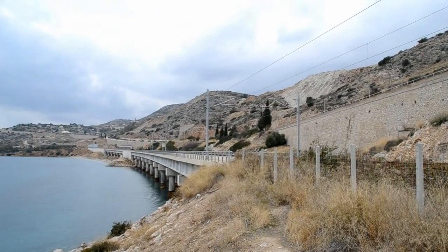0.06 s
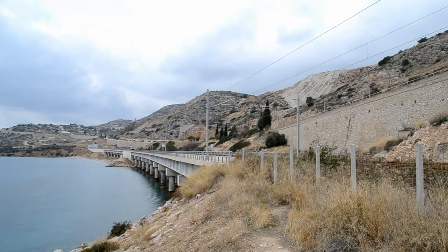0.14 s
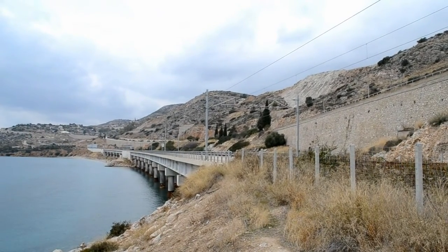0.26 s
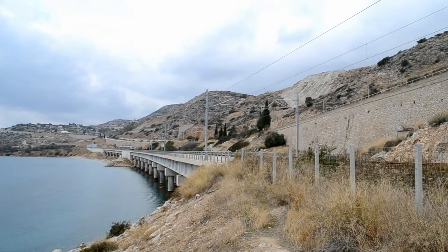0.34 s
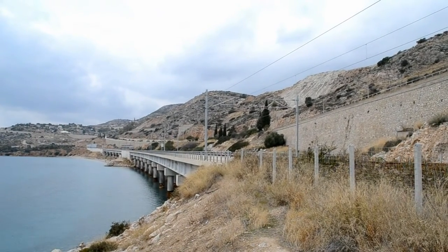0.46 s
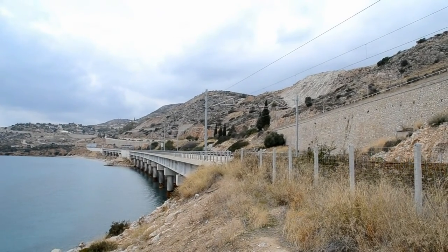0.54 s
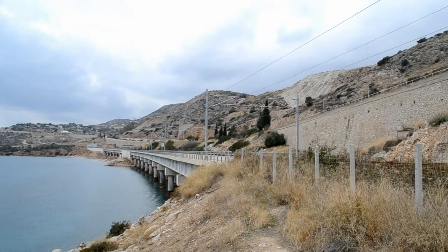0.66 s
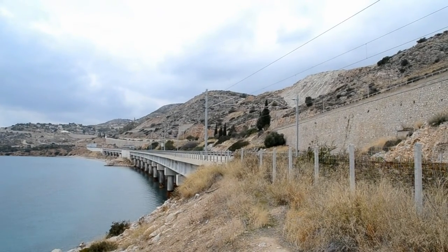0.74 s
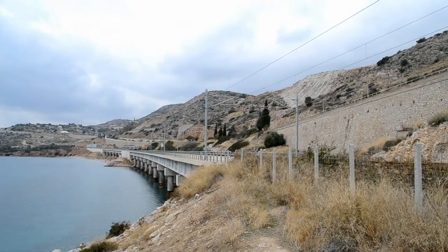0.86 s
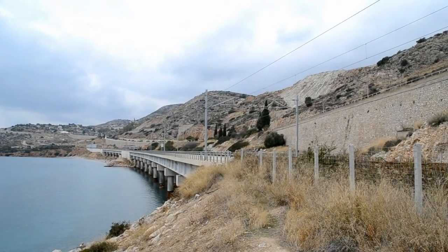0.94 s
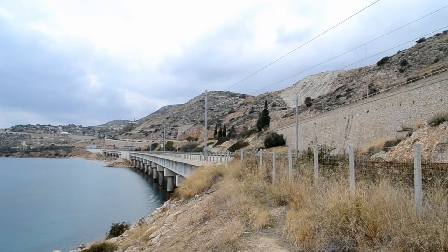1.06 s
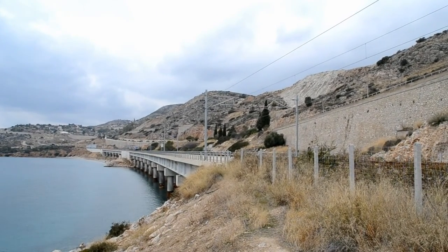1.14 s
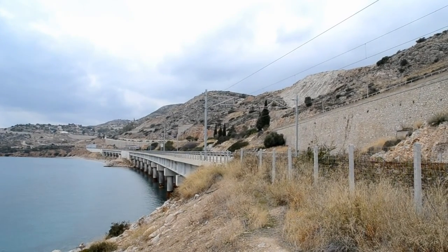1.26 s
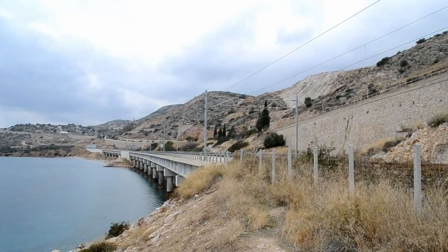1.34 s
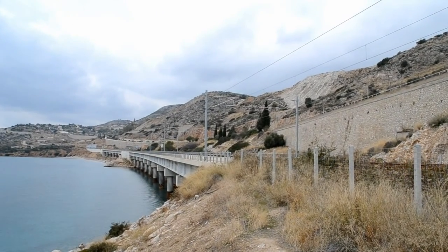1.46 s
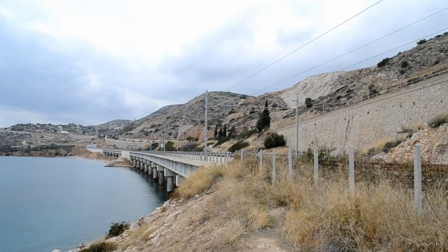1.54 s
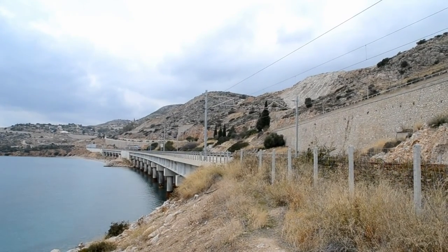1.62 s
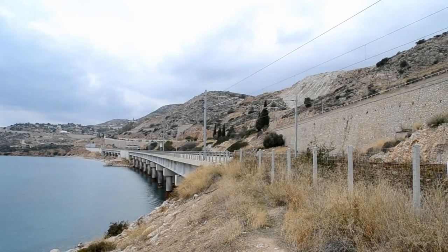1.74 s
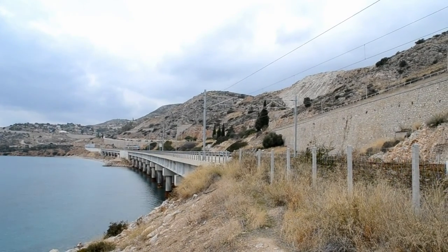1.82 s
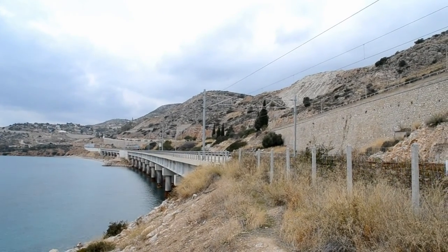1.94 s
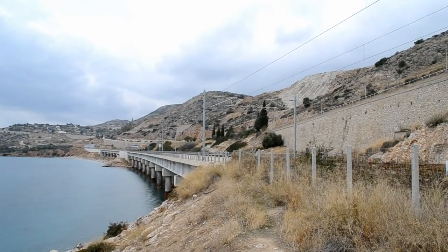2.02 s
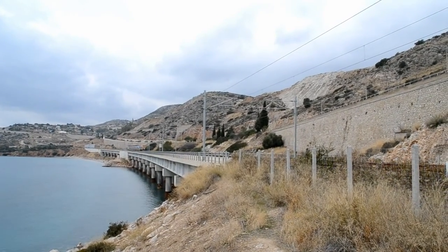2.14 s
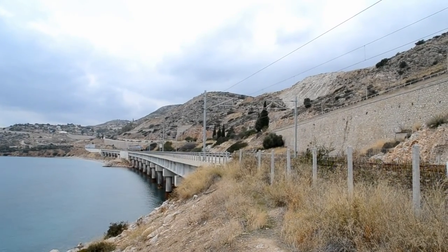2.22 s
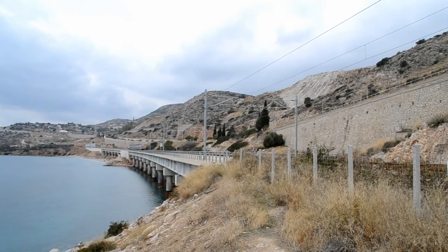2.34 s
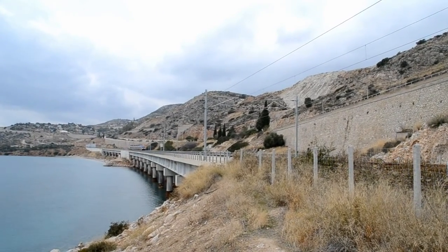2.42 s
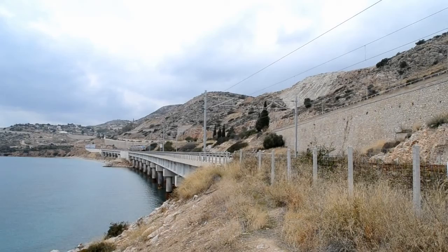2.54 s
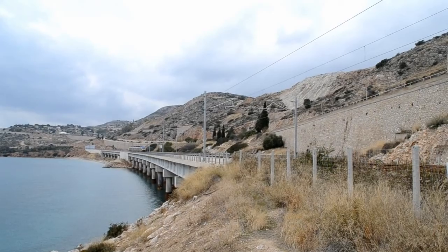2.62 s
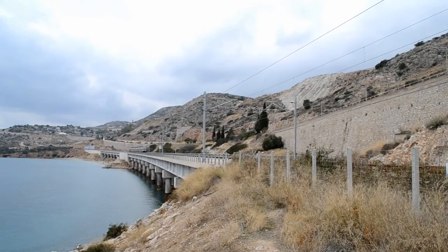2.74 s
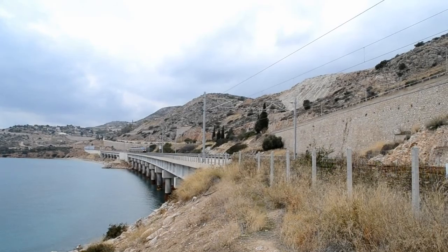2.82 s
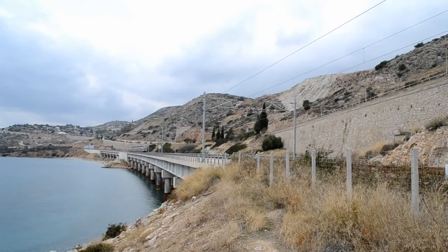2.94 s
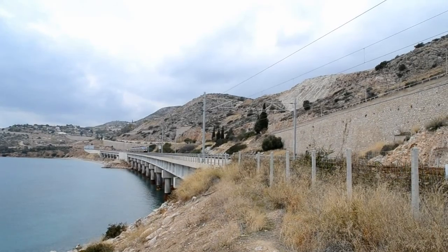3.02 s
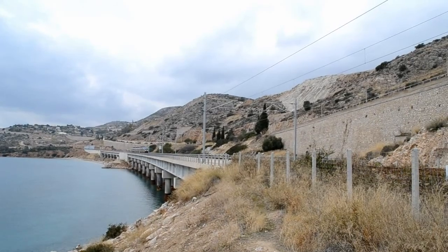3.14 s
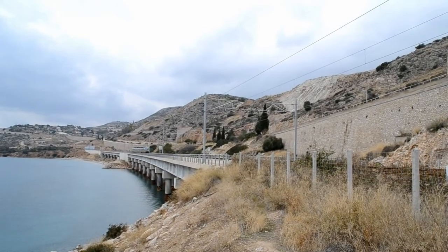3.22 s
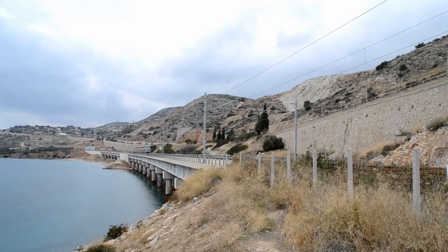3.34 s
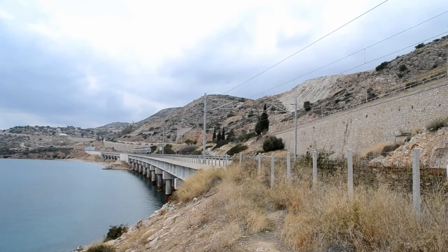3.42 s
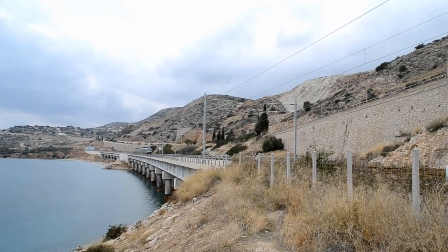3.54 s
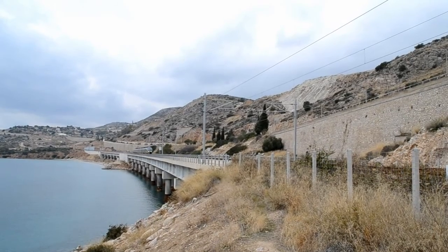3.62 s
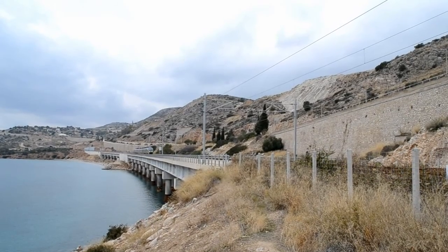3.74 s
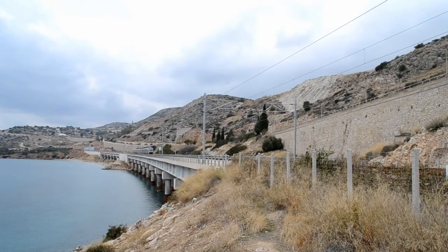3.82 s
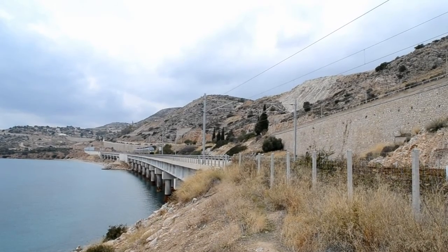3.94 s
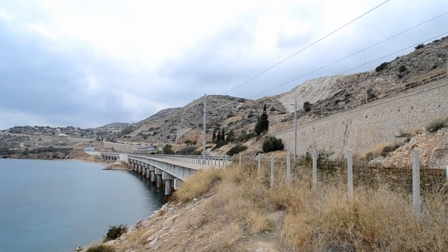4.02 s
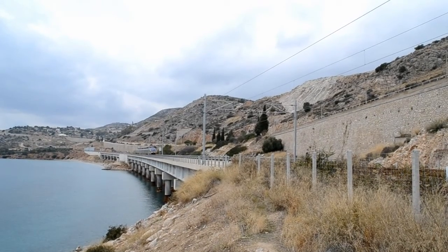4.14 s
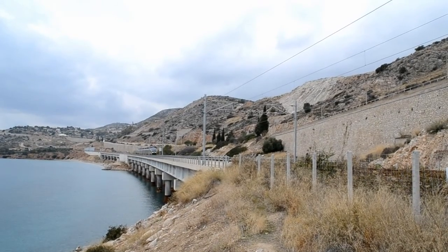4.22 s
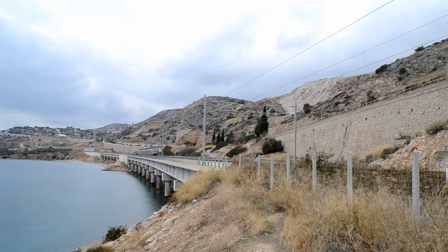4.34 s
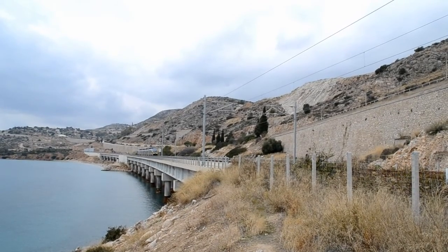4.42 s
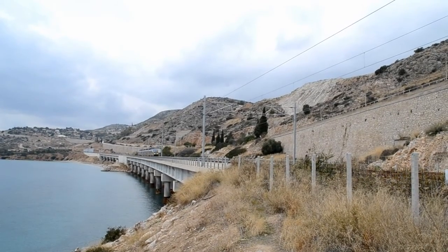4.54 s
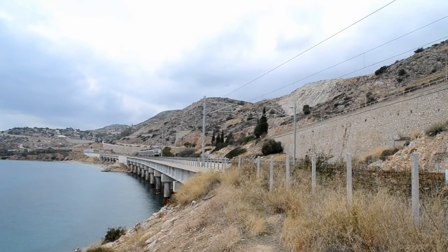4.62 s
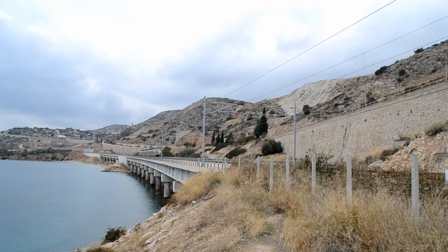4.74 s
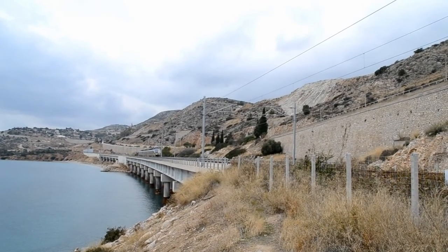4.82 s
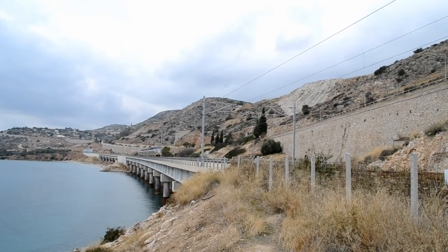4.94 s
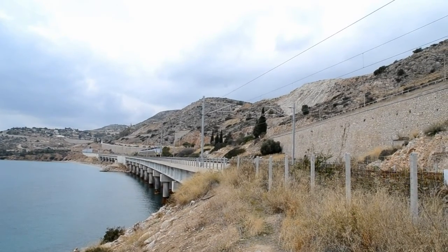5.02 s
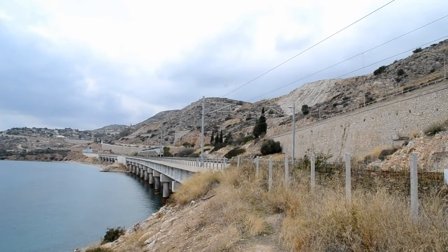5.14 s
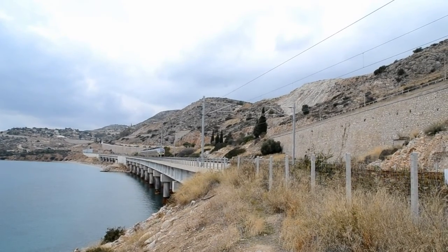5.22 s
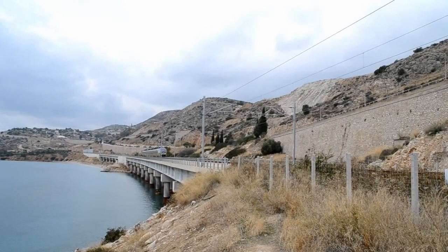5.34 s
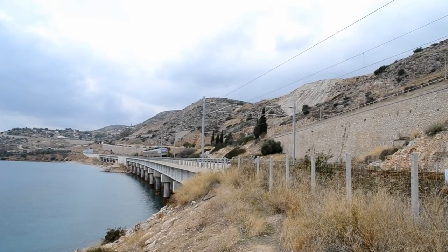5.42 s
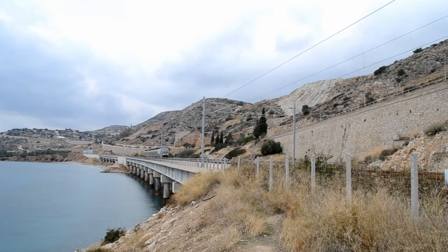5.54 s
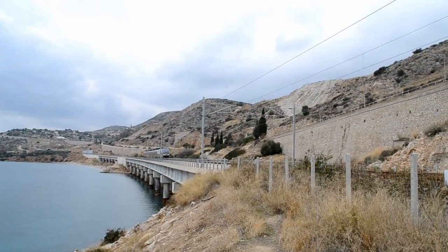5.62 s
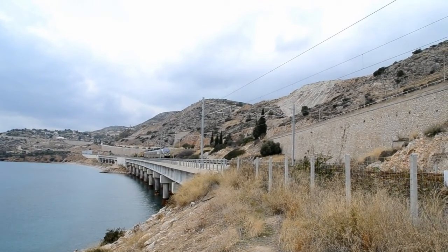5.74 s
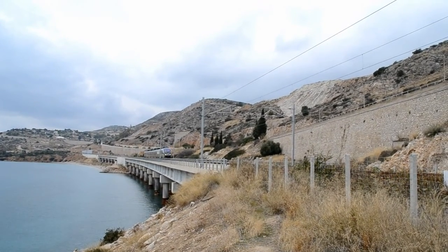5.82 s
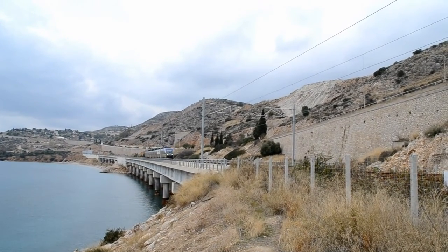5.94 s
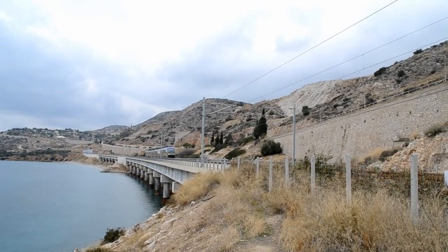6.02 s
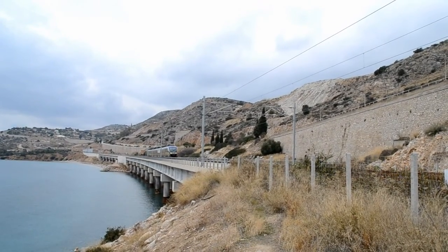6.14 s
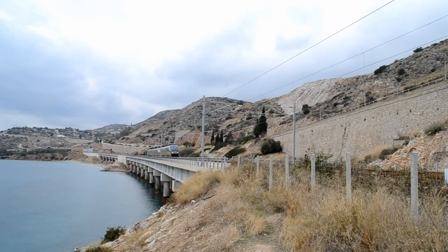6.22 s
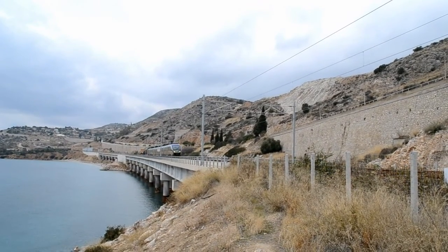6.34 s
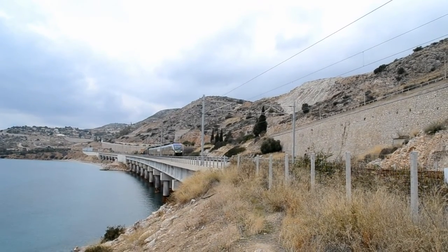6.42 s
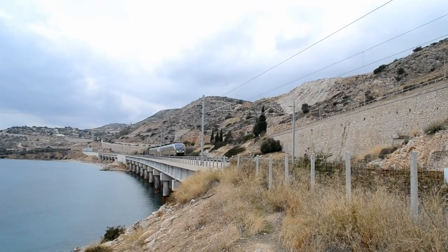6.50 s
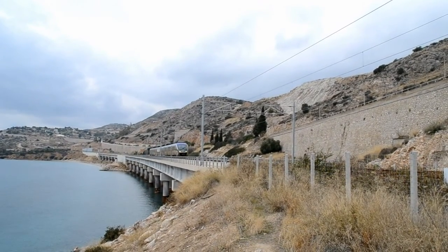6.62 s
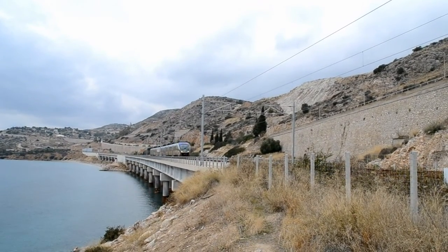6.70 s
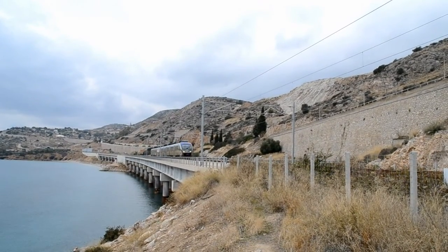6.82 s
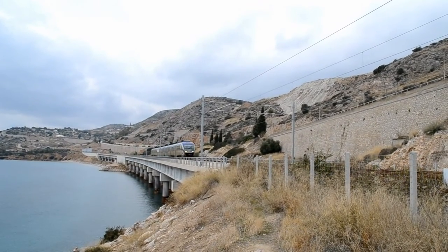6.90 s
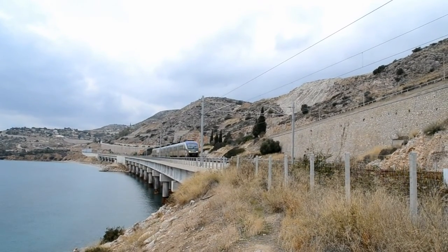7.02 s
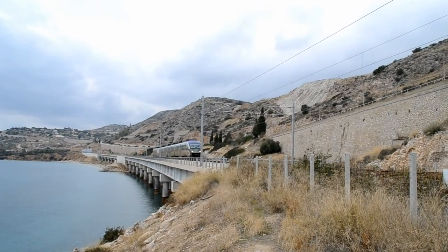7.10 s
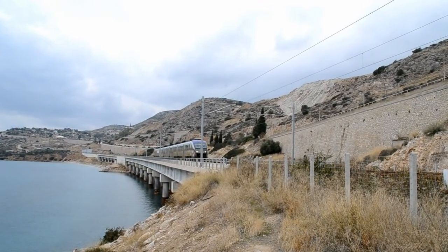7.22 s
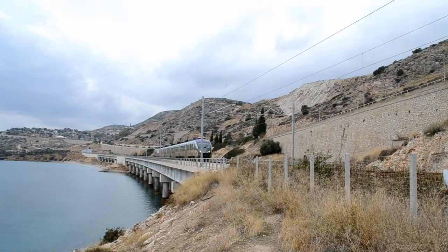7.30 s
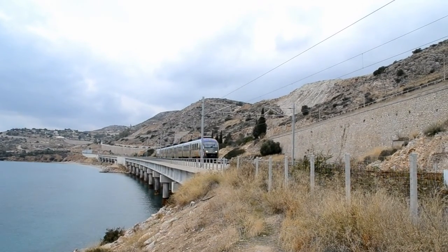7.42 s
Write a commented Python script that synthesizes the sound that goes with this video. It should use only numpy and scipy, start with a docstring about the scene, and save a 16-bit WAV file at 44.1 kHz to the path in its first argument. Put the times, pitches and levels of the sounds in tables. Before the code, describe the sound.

Quiet water wash and windy dry grass, one sharp plastic double click close by, then a train's roar and singing rails steadily growing nearer.

```python
"""An electric train comes along a viaduct above the sea, with water, wind and a hand-held camera close by.
First water washes and gusts rush as filtered noise, dry grass crackles in grains, ticks and scrapes;
the camera bumps softly as damped sines, and its shell gives one sharp double click as decaying modes.
Then a small bird peeps once, a gliding sine. Bass and rolling roar swell as noise, rails sing ahead of
the train as wavering resonances, hiss brightens the roar, and clacks and a deck drone come last."""
import sys
import numpy as np
from scipy import signal
from scipy.fft import rfft, irfft, next_fast_len
from scipy.io import wavfile
from scipy.ndimage import uniform_filter1d, map_coordinates

SR = 44100
rng = np.random.default_rng(int(sys.argv[2]) if len(sys.argv) > 2 else 0)


def generate_wav(sig):
    """Save sig (samples, or channels by samples) to the path in sys.argv[1] as 16-bit PCM at SR."""
    pcm = np.round(np.clip(np.atleast_2d(sig).T, -1, 1) * 32767).astype(np.int16)
    wavfile.write(sys.argv[1], SR, pcm)


N = 329427
TIME_S = np.arange(N) / SR


def amp(db):
    """Logarithmic level: decibels become an amplitude gain."""
    return 10 ** (np.asarray(db) / 20)


def unit(x):
    """Normalisation: scale to rms 1."""
    return x / np.sqrt(np.mean(x ** 2) + 1e-20)


def wobble(rate):
    """Random modulation: a smooth curve through random knots, rate of them a second."""
    knots = rng.standard_normal(int(N * rate / SR) + 4)
    return map_coordinates(knots, [np.arange(N) * rate / SR])


def swell(at, half_length):
    """Gaussian envelope: 1 at its top, 1/e at half_length seconds to either side."""
    return np.exp(-((TIME_S - at) / half_length) ** 2)


def filtered(x, response):
    """Linear filtering: the spectrum is multiplied by a response of frequency."""
    m = next_fast_len(N + SR // 2)
    return irfft(rfft(x, m) * response(np.fft.rfftfreq(m, 1 / SR)), m)[:N]


def coloured(x, spectrum):
    """Spectral shaping: x through a (Hz, dB) curve, straight over log frequency, at rms 1."""
    f, db = np.transpose(spectrum)
    return unit(filtered(x, lambda hz: amp(np.interp(np.log(hz + 1), np.log(f), db))))


def rush(spectrum, patchy_db):
    """Turbulent noise: random gain in patches of time and frequency, then spectral shaping to rms 1."""
    z = signal.stft(rng.standard_normal(N), nperseg=512)[2]
    across_pitch = uniform_filter1d(rng.standard_normal(z.shape), size=7, axis=0)
    patches = uniform_filter1d(across_pitch, size=12, axis=1)
    noise = signal.istft(z * amp(patchy_db * unit(patches)), nperseg=512)[1][:N]
    return coloured(noise, spectrum)


def singing(modes):
    """Resonance: narrow (Hz, half width Hz, dB) modes under steady random shaking, at rms 1."""
    def response(f):
        return sum(amp(db) / (1 + ((f - hz) / width) ** 2) for hz, width, db in modes)
    return unit(filtered(rng.standard_normal(N), response))


def add(track, s, db, sound):
    """Superposition: mix a sound in at time s with the given peak level."""
    room = track[round(s * SR):][:len(sound)]
    room += (amp(db) * sound / np.abs(sound).max())[:len(room)]


def snap(hz, t60, order=2):
    """Impact noise: an exponentially dying burst in an octave band around one pitch, at peak 1."""
    t = np.arange(SR // 5) / SR
    edges = np.clip([hz / np.sqrt(2), hz * np.sqrt(2)], 50, SR / 2 - 100)
    band = signal.butter(order, edges, "band", fs=SR, output="sos")
    burst = signal.sosfilt(band, rng.standard_normal(len(t)) * amp(-60 * t / t60))
    return burst / np.abs(burst).max()


# spectrum of the washing water: pitch_hz [Hz], level_db [dB per Hz, relative]
SEA_SPECTRUM = [(20, -22.5), (50, -7.5), (90, -1.5), (150, -2), (220, -2), (310, -6.5), (460, 4), (680, -1),
                (1100, -0.5), (1700, -5), (3300, -12.5), (4400, -25.5), (9500, -39.5), (11500, -50.5)]


def sea():
    """Broadband turbulence: water washes evenly on the rocks far below."""
    return amp(-53.5 + 0.47 * wobble(2.47)) * rush(SEA_SPECTRUM, patchy_db=0.2)


# strength of the wind in the grass: start_s [s], level_db [dB]
WIND_STRENGTH = [(0.0, -76), (0.29, -73.5), (0.35, -69), (0.58, -69), (1.01, -66), (1.23, -66),
                 (1.4, -70.5), (1.55, -70.5), (1.63, -76.5), (1.8, -73.5), (2.0, -71), (2.26, -70.5),
                 (2.68, -77.5), (2.98, -76.5), (3.17, -75.5), (3.3, -77), (3.46, -70), (3.719, -69.5),
                 (4.0, -67.5), (4.69, -75), (5.201, -77.5)]
# the strongest wind; from CALM_S on it dies down at a steady rate
STRONGEST_DB, CALM_S, CALM_DB_PER_S = -66, 5.3, 2.5


def wind_level():
    """Common driving force: wind strength in dB relative to its strongest, shared by air and grass."""
    when, strength_db = np.transpose(WIND_STRENGTH)
    calming_db = CALM_DB_PER_S * np.maximum(TIME_S - CALM_S, 0)
    return np.interp(TIME_S, when, strength_db - STRONGEST_DB) - calming_db


# spectrum of the rushing gusts: pitch_hz [Hz], level_db [dB per Hz, relative]
GUST_SPECTRUM = [(350, -40.5), (800, 1.5), (1400, -7.5), (1900, -1.5), (2400, 2.5), (2750, -1.5), (3350, 0),
                 (3750, -4.5), (4200, -17), (6000, -20), (9000, -44)]
# level at the strongest wind, and dB gained per dB of wind
GUST_DB, GUST_GROWS = -53.5, 0.86


def gusts(wind_db):
    """Aerodynamic noise: moving air rushes over the slope, louder with the wind."""
    gust_db = GUST_DB + GUST_GROWS * wind_db + 0.45 * wobble(9)
    return amp(gust_db) * rush(GUST_SPECTRUM, patchy_db=2.0)


# spectrum of the dry grass: pitch_hz [Hz], level_db [dB per Hz, relative]
GRASS_SPECTRUM = [(2000, -18), (3600, 7), (4600, 0.5), (5800, 2), (6500, -10.5), (7200, -11.5),
                  (8500, -0.5), (9800, -1), (10400, -11.5), (11300, -16.5)]
# tufts brush together in short flurries: centre_s [s], level_db [dB], half_length_s [s]
GRASS_FLURRIES = [(.37, -73, 0.071), (0.555, -79, 0.056), (1.565, -66.5, 0.028), (2.42, -72, 0.045),
                  (3.03, -70.5, 0.026), (3.14, -67.5, 0.089)]
# level at the strongest wind, and dB gained per dB of wind
GRASS_DB, GRASS_GROWS = -65, 1.4
# single stalks: ring time (s), spread of sizes (dB), level over the finest touches (dB)
STALK_LIFE_S, STALK_SPREAD_DB, STALK_DB = 0.015, 12, -4


def grass(wind_db):
    """Granular friction: dry stalks brush together in a dense sum of tiny random contacts."""
    touches = (rng.random(N) < 3500 / SR) * rng.standard_normal(N)
    crackle = np.zeros(N)
    # each stalk cracks at its own size and pitch, up to the last wind entry
    for moment, size, pitch in rng.random((900, 3)):
        crack = snap(hz=3500 + 6000 * pitch, t60=STALK_LIFE_S)
        add(crackle, moment * WIND_STRENGTH[-1][0], STALK_SPREAD_DB * size, crack)
    grains = coloured(unit(touches) + amp(STALK_DB) * unit(crackle), GRASS_SPECTRUM)
    stir = amp(GRASS_DB + GRASS_GROWS * wind_db)
    flurries = sum(amp(db) * swell(s, length) for s, db, length in GRASS_FLURRIES)
    # independent stirrings add in power
    return np.hypot(stir, flurries) * amp(1.0 * wobble(45)) * grains


# puffs on the microphone: centre_s [s], half_length_s [s], level_db [dB]
WIND_BUFFETS = [(0.048, 0.071, -68), (0.517, 0.13, -62), (1.723, 0.1, -67), (2.416, 0.061, -63),
                (2.84, 0.1, -61), (3.09, 0.073, -59)]
# their spectrum: pitch_hz [Hz], level_db [dB per Hz, relative]
BUFFET_SPECTRUM = [(20, -12), (45, -2), (85, 3), (150, -10), (300, -32), (700, -60)]


def buffeting():
    """Pressure fluctuation: puffs of wind press softly on the microphone as low noise."""
    puffs = sum(amp(db) * swell(s, length) for s, length, db in WIND_BUFFETS)
    return puffs * coloured(rng.standard_normal(N), BUFFET_SPECTRUM)


# dry stalks tick: start_s [s], peak_db [dB], pitch_hz [Hz], ring_time_s [s]
STALK_TICKS = [(0.14, -53, 5000, .017), (0.1562, -42, 2300, 0.017), (0.193, -51, 4500, .017),
               (0.332, -41.5, 2950, .02), (0.3796, -57, 7500, .016), (0.567, -49, 4400, .017),
               (0.601, -44, 3100, .012), (1.005, -54, 5600, .012), (1.07, -51, 8000, .012),
               (1.2342, -52, 5600, .014), (1.4692, -55, 4730, .014), (1.537, -56, 5400, .01),
               (1.552, -55, 5400, .017), (2.592, -53.5, 4960, .014), (2.999, -49, 4140, .017),
               (3.087, -57, 5200, .017), (3.1185, -43, 2700, .008), (3.125, -47, 3900, .02),
               (3.148, -55, 5400, .017), (3.179, -39, 2300, 0.018), (3.24, -57, 6200, .017),
               (3.5632, -33, 2460, .015), (3.623, -51, 4300, .014), (3.7, -45.5, 4120, .017),
               (3.723, -54, 5800, .017), (3.784, -52, 5600, .014), (3.977, -53, 5060, .01),
               (4.021, -54, 5500, .014), (4.121, -37, 2200, .012), (4.133, -36.5, 2080, .014),
               (4.731, -48, 3470, .024)]


def stalk_ticks():
    """Impulsive contact: single dry stalks knock, each a short band of noise."""
    out = np.zeros(N)
    for s, db, hz, life in STALK_TICKS:
        add(out, s, db, snap(hz, t60=life, order=5))
    return out


# stalks scrape past each other: start_s [s], length_s [s], peak_db [dB], pitch_hz [Hz]
STALK_SCRAPES = [(0.335, 0.037, -49, 3000), (3.105, .09, -47, 2900), (3.568, 0.077, -44, 3100)]
# ring time of one slip, and how much the slips weaken along a scrape
SLIP_LIFE_S, SLIP_FADE_DB = 0.0087, 9


def scrapes(count=6):
    """Stick-slip friction: stalks catch and slip in uneven little cracks that weaken as they part."""
    out = np.zeros(N)
    for s, length, db, hz in STALK_SCRAPES:
        for part in rng.random(count):
            slip = snap(hz, t60=SLIP_LIFE_S, order=4)
            add(out, s + part * length, db - SLIP_FADE_DB * part, slip)
    return out


# soft handling bumps: start_s [s], peak_db [dB], pitch_hz [Hz], rub_db [dB, relative to the thud]
HAND_BUMPS = [(0.445, -48, 170, -10), (0.487, -41, 173, -5), (0.511, -46, 100, -5), (0.774, -45, 170, -13),
              (0.83, -47, 190, -3), (1.765, -54, 70, -8), (1.838, -43.5, 205, -2), (2.906, -40, 179, -18),
              (2.965, -48, 102, -13), (3.029, -48, 90, -16), (3.076, -40, 176, -2)]
# a bump dies away by 60 dB within this many of its own cycles
BUMP_CYCLES = 5.7


def hand_bumps():
    """Damped oscillation: the hand bumps the camera in low thuds, with a little rubbing noise."""
    out, t = np.zeros(N), np.arange(SR // 5) / SR
    soft_onset = 1 - np.exp(-(t / 0.0011) ** 2)
    for s, db, pitch_hz, rub_db in HAND_BUMPS:
        life = BUMP_CYCLES / pitch_hz
        thud = np.sin(2 * np.pi * pitch_hz * t) * amp(-60 * t / life) * soft_onset
        add(out, s, db, thud + amp(rub_db) * snap(hz=383, t60=life))
    return out


# modes of the plastic shell: pitch_hz [Hz], width_hz [Hz], level_db [dB, relative spectral peak]
SHELL_MODES = [(830, 100, -7), (1310, 56, -14), (1490, 180, 1), (2100, 68, -4.5), (2450, 140, 5),
               (3260, 200, 4.5), (3440, 100, -7), (3840, 450, -27), (4940, 440, -12.5), (6930, 430, -19),
               (9400, 1200, -35)]
# a catch snaps and rebounds: start_s [s], peak_db [dB], brightness [dB per octave]
CATCH_CONTACTS = [(0.93665, -9.5, -2), (0.94062, -14.5, 3), (0.9472, -33, 0)]
# the dry crack of each contact, relative to its ring
CRACK_DB = -28


def catch_click():
    """Modal ringing: a snapping catch sets the camera's plastic shell ringing at each contact."""
    out, t = np.zeros(N), np.arange(SR // 5) / SR
    hz, width, mode_db = np.transpose(SHELL_MODES)[:, :, None]
    # a mode of width w dies as exp(-pi w t)
    modes = amp(mode_db) * width * np.exp(-np.pi * width * t) * np.sin(2 * np.pi * hz * t)
    onset = 1 - np.exp(-(t / 0.00028) ** 2)
    # so small a shell radiates no bass
    no_bass = signal.butter(4, 650, "high", fs=SR, output="sos")
    for s, db, bright_db in CATCH_CONTACTS:
        ring = (amp(bright_db * np.log2(hz)) * modes).sum(axis=0) * onset
        add(out, s, db, signal.sosfilt(no_bass, ring))
        add(out, s, db + CRACK_DB, snap(hz=7000, t60=0.012))
    return out


def bird(at=2.535, length=.033, lead_in=.055, hz=7110, fall=3200, db=-78):
    """Frequency glide: one thin peep, a soft level start, then a louder end falling by fall Hz per s."""
    t = TIME_S - at
    pitch_hz = hz - fall * np.maximum(t, -length / 2)
    envelope = swell(at, length) + swell(at - lead_in, length) / 3
    return amp(db) * envelope * np.sin(2 * np.pi * np.cumsum(pitch_hz) / SR)


# the train approaches at a steady speed: distance at the start (m), speed (m/s)
START_M, SPEED_M_S = 230, 25


def beyond(metres):
    """Uniform motion: how far, in metres, the train still is outside a given distance."""
    return np.maximum(START_M - SPEED_M_S * TIME_S - metres, 0)


# the train is heard clear of the hillside from this distance (m); loss beyond it (dB per m)
EMERGES_M, HIDDEN_DB_PER_M = 155, 0.6


def hillside_loss():
    """Acoustic shadow: dB lost while the train is behind the hillside."""
    return HIDDEN_DB_PER_M * beyond(EMERGES_M)


# rolling level as the train comes nearer: start_s [s], level_db [dB, before ROAR_OVER_DB]
ROLLING_LEVEL = [(2.85, -59.5), (3.4, -59.5), (4.3, -53.0), (4.85, -54), (5.5, -50.5), (5.9, -48.5),
                 (6.4, -45.0), (6.95, -43), (7.47, -40.5)]
# the roar's full spectrum over that level (dB); its rise while still behind the hillside (dB per s)
ROAR_OVER_DB, ROAR_RISE_DB_PER_S = 1.5, 18


def roar_level():
    """Level envelope: the rolling level in dB, steeply lower before the first entry."""
    when, rolling_db = np.transpose(ROLLING_LEVEL)
    behind_db = ROAR_RISE_DB_PER_S * np.maximum(when[0] - TIME_S, 0)
    return np.interp(TIME_S, when, rolling_db) + ROAR_OVER_DB - behind_db


# bass of the approaching train: pitch_hz [Hz], level_db [dB per Hz, relative]
RUMBLE_SPECTRUM = [(20, -16), (55, -6.5), (130, -2.5), (220, 1), (280, -3.5), (450, -11), (1000, -64)]


def rumble(roar_db):
    """Diffraction: bass bends round the hillside, so it is there early and grows slowly."""
    return amp(0.48 * roar_db - 36.5 + wobble(5.1)) * rush(RUMBLE_SPECTRUM, patchy_db=0.5)


# spectrum of the rolling wheels: pitch_hz [Hz], level_db [dB per Hz, relative]
ROAR_SPECTRUM = [(20, -35), (55, -17.5), (100, -6.5), (160, -6), (210, -1.5), (265, -6.5), (335, -6.5),
                 (385, -0.5), (480, 1), (680, 0.5), (800, 1.5), (950, -1), (1450, -14), (2400, -11),
                 (4500, -69)]


def rolling_roar(roar_db):
    """Rolling noise: wheels on rails roar as broadband noise that follows the rolling level."""
    return amp(roar_db + 0.22 * wobble(14)) * rush(ROAR_SPECTRUM, patchy_db=1.0)


# bending waves that run along the rails: pitch_hz [Hz], half_width_hz [Hz], level_db [dB, relative],
# damping [dB per m], pitch_rise [Hz per s]
RAIL_WAVES = [(830, 10, -11, 1.5, 0), (1037, 20, -7, .3, 2), (1138, 15, -3.5, .31, -1),
              (1203, 12, -7, 0.4, 2), (1256, 24, -5, 0.2, 3), (1324, 20, -4.5, 0.14, 0),
              (1359, 18, -3, 0.3, 2)]
# parts of the song swell and dip: centre_s [s], half_length_s [s], change_db [dB], pitch_hz [Hz]
SONG_SURGES = [(3.55, .08, 3, 1340), (3.817, .08, -1, 1340), (4.41, 0.052, 4, 1340),
               (4.49, 0.036, -11, 1340), (4.873, .06, 5, 1200), (5.0, 0.035, 2, 1330), (5.7, .05, 4, 1340),
               (5.76, .08, 7, 1250), (5.994, 0.06, 3, 1350), (6.124, .05, 4, 1140), (6.33, 0.067, 5, 1340),
               (6.54, 0.091, -9, 1330), (6.537, 0.16, -9, 1150), (6.76, .1, -4, 1260), (6.96, .06, 4, 1360),
               (7.047, .05, 11.5, 1100), (7.31, .12, 6, 1150), (7.41, 0.11, 7.5, 1360)]
# a surge reaches this far to either side (Hz); the strands flutter within this time (s)
SURGE_REACH_HZ, FLUTTER_S = 85, 0.13
# song gain, full within SONG_M (m); waver of each strand (Hz)
SONG_DB, SONG_M, WAVER_HZ = -47, 69, 4.5


def rail_song():
    """Bending waves: each strand wavers, flutters and surges, and fades with distance at its own rate."""
    song = np.zeros(N)
    surges = np.array([db * swell(s, length) for s, length, db, _ in SONG_SURGES])
    centre_hz = np.array(SONG_SURGES)[:, 3]
    for hz, width, db, db_per_m, rise_hz in RAIL_WAVES:
        # reading a resonance faster or slower bends its pitch
        shift_hz = rise_hz * (np.arange(N) - N) / SR + WAVER_HZ * wobble(9)
        read_at = np.cumsum(1 + shift_hz / hz)
        strand = map_coordinates(singing([(hz, width, 0)]), [read_at], order=1, mode="mirror")
        # even out slow swings, so each strand keeps its quick flutter and the surges stand out
        power = np.abs(uniform_filter1d(strand ** 2, size=int(FLUTTER_S * SR)))
        evened = unit(strand / np.sqrt(power + 1e-9))
        surge_db = np.exp(-((hz - centre_hz) / SURGE_REACH_HZ) ** 2) @ surges
        song += amp(db - db_per_m * beyond(SONG_M) + surge_db) * evened
    return amp(SONG_DB - hillside_loss() + 0.6 * wobble(16)) * song


def rail_sizzle():
    """High-frequency resonance: the rails also carry a thin, very high sizzle."""
    level_db = -88.0 - 0.145 * beyond(SONG_M) - 0.5 * hillside_loss()
    return amp(level_db) * singing([(9450, 100, 0)])


# spectrum of the wheel hiss: pitch_hz [Hz], level_db [dB per Hz, relative]
HISS_SPECTRUM = [(500, -24.5), (1000, -1), (1500, 0.5), (2100, 1), (2800, -3), (3500, -5), (4200, -16.5),
                 (5100, -23.5), (6200, -29), (7100, -29.5), (8000, -42), (9400, -35), (10000, -49.5),
                 (11000, -65)]
# the far hiss swells once: centre_s [s], half_length_s [s], level_db [dB]
HISS_SWELL = (4, 0.36, -53.5)
# near level (dB); the deck screens it beyond SCREEN_M (m) by so much (dB per m), up to a limit (dB)
HISS_DB, SCREEN_M, SCREEN_DB_PER_M, SCREEN_MAX_DB = -37.5, 58.6, .5, 22


def wheel_hiss():
    """Barrier screening: the deck shades the wheel hiss until the train is near."""
    screen_db = np.minimum(SCREEN_DB_PER_M * beyond(SCREEN_M), SCREEN_MAX_DB)
    approach = amp(HISS_DB - screen_db - hillside_loss())
    early_s, early_length, early_db = HISS_SWELL
    gain = np.hypot(approach, amp(early_db) * swell(early_s, early_length))
    return gain * amp(0.65 * wobble(30)) * rush(HISS_SPECTRUM, patchy_db=0.5)


# running gear clacks: start_s [s], peak_db [dB], pitch_hz [Hz], ring_time_s [s]
GEAR_CLACKS = [(6.096, -37.5, 2400, .02), (6.1534, -36, 2570, .025), (6.2266, -29, 1900, 0.0084),
               (6.304, -35, 2000, .025), (6.3768, -28.5, 980, 0.014), (7.048, -28, 1890, .03),
               (7.374, -29, 1400, .02)]


def gear_clacks():
    """Impact excitation: the running gear clacks in short bands of noise."""
    out = np.zeros(N)
    for s, db, hz, life in GEAR_CLACKS:
        add(out, s, db, snap(hz, t60=life, order=3))
    return out


# resonance of the viaduct deck: pitch_hz [Hz], half_width_hz [Hz], level_db [dB, relative]
DECK_MODES = [(378, 6.7, 0)]


def deck_drone():
    """Structural resonance: the deck drones under the wheels only once they are near."""
    return amp(-53.5 - 1.4 * beyond(SCREEN_M)) * singing(DECK_MODES)


def train():
    """Superposition of the train's sources: rolling, rails, hiss, clacks and deck drone."""
    roar_db = roar_level()
    rolling = rumble(roar_db) + rolling_roar(roar_db)
    rails = rail_song() + rail_sizzle()
    return rolling + rails + wheel_hiss() + gear_clacks() + deck_drone()


def scene():
    """Linear superposition: everything in the open air adds at one microphone."""
    wind_db = wind_level()
    slope = gusts(wind_db) + grass(wind_db) + stalk_ticks() + scrapes()
    camera = hand_bumps() + catch_click()
    return (sea() + slope + buffeting() + camera + bird() + train())[None]


def record(dry):
    """Band limitation: a very steep low-pass near 10.9 kHz, the camera's upper limit."""
    top_hz = 10900
    return filtered(dry[0], lambda hz: 1 / np.sqrt(1 + (hz / top_hz) ** 80))[None]


dry = scene()
out = record(dry)
generate_wav(out)
```